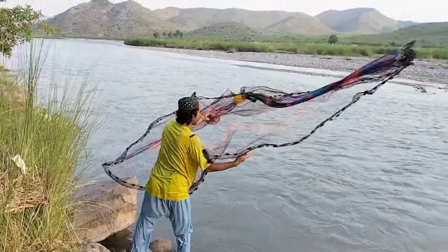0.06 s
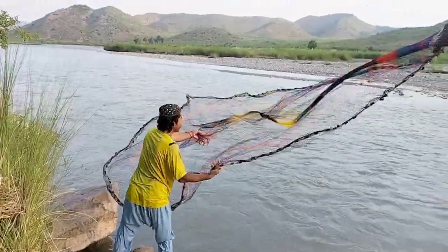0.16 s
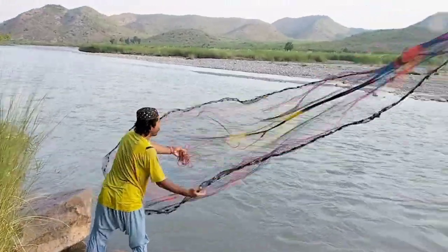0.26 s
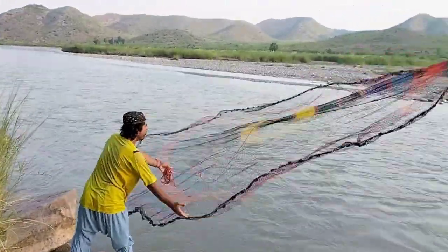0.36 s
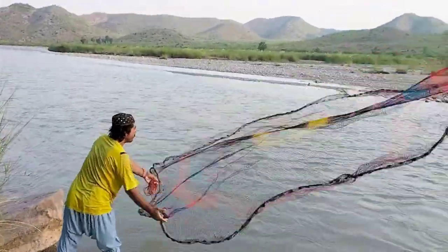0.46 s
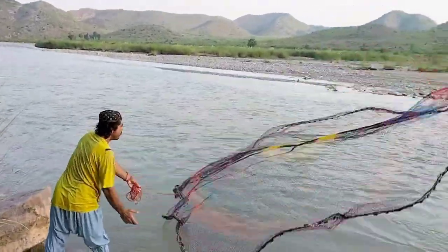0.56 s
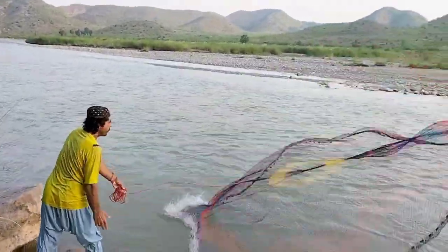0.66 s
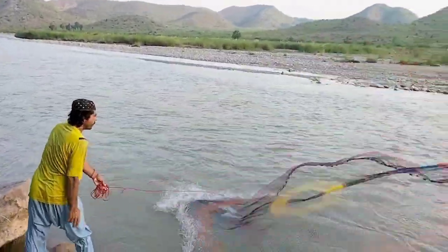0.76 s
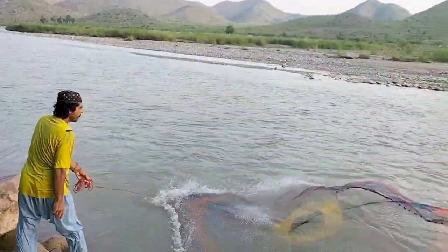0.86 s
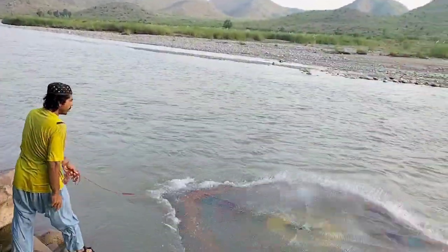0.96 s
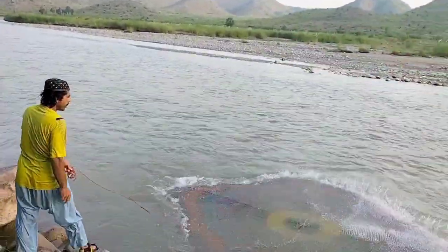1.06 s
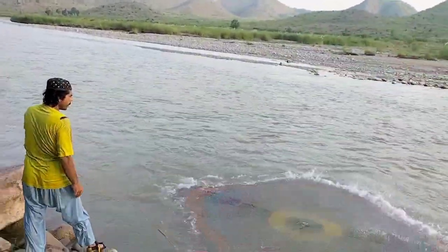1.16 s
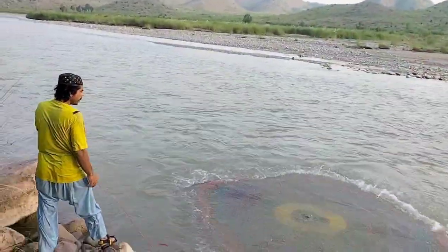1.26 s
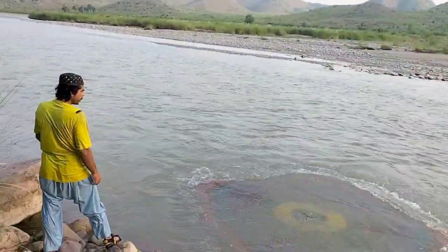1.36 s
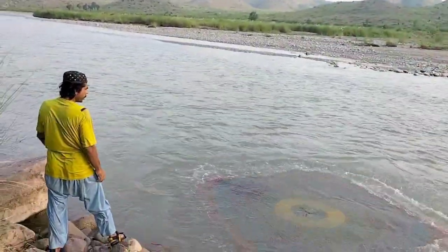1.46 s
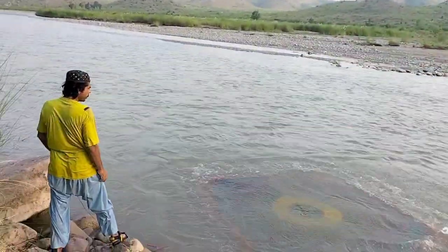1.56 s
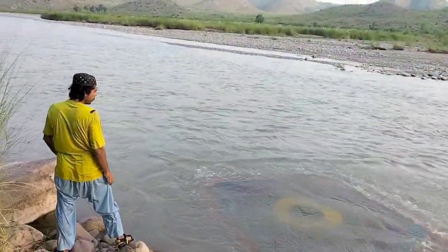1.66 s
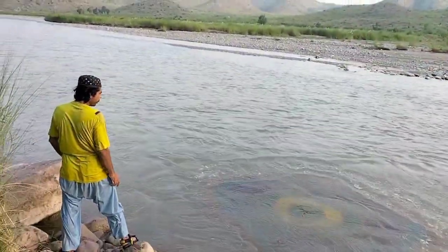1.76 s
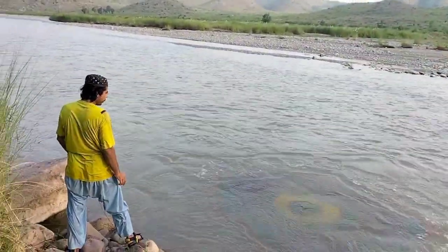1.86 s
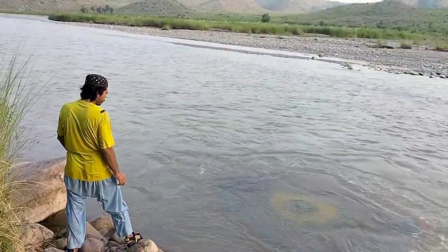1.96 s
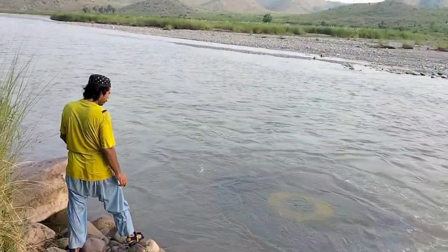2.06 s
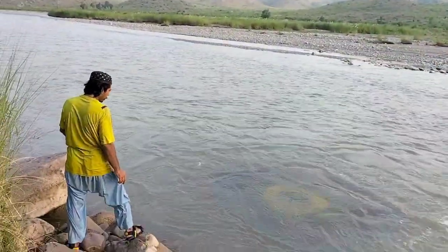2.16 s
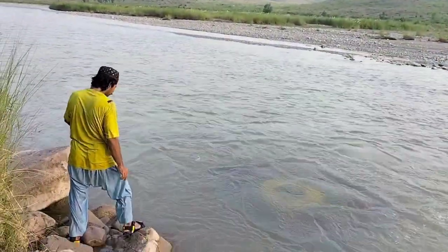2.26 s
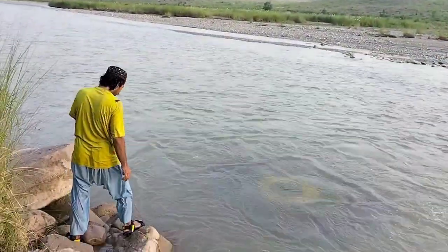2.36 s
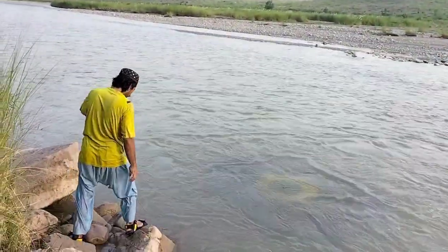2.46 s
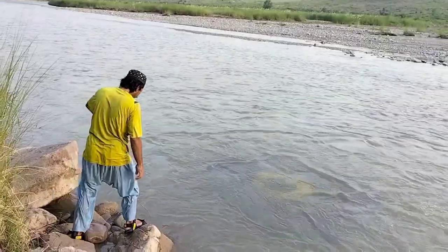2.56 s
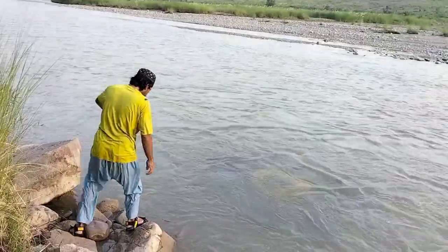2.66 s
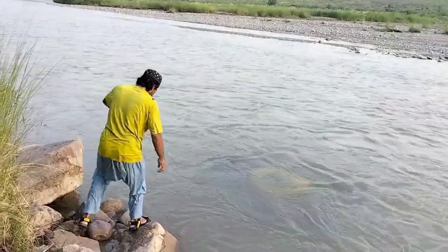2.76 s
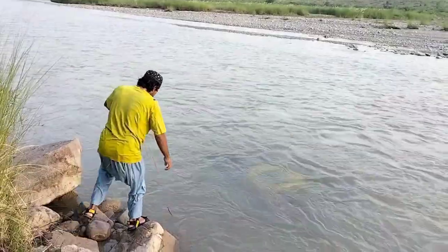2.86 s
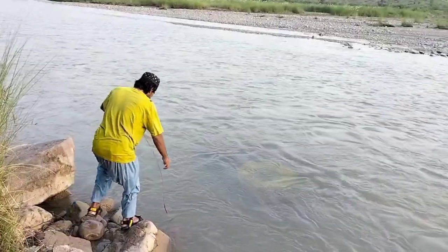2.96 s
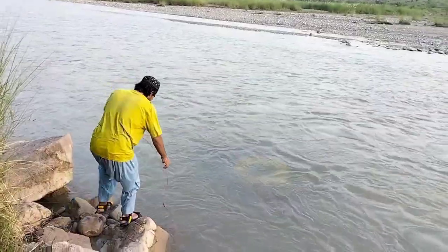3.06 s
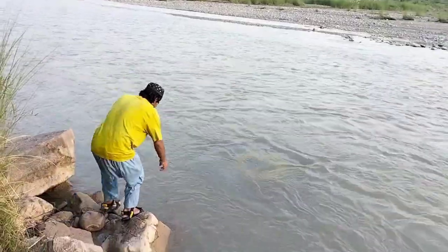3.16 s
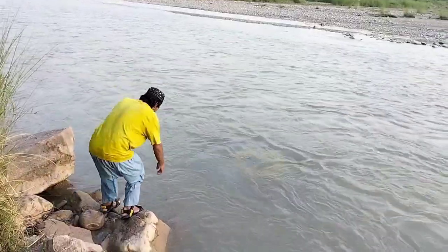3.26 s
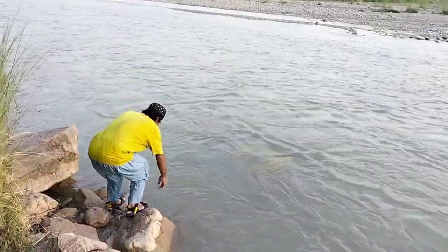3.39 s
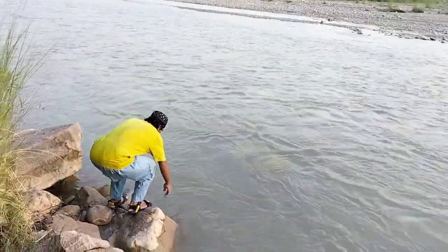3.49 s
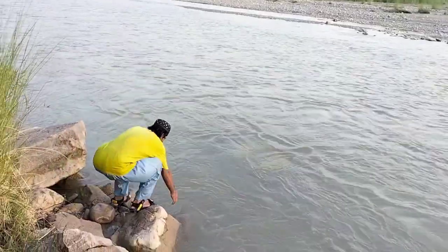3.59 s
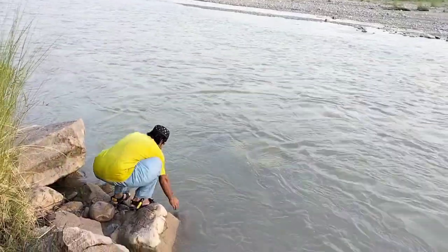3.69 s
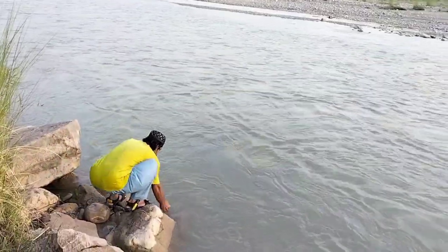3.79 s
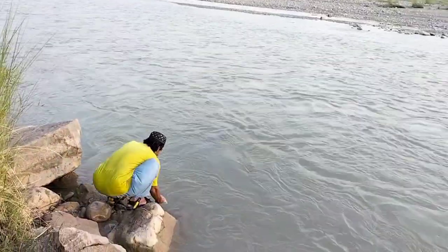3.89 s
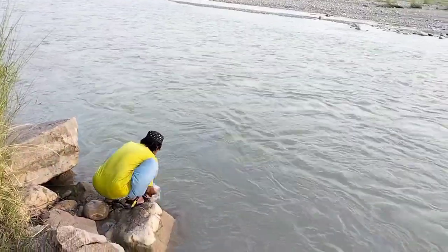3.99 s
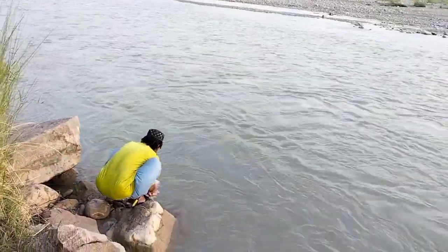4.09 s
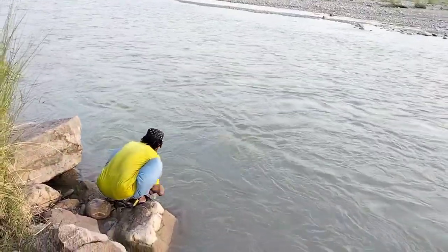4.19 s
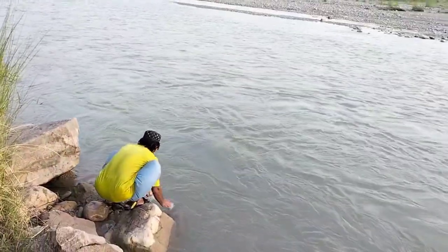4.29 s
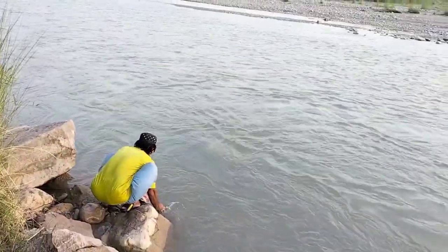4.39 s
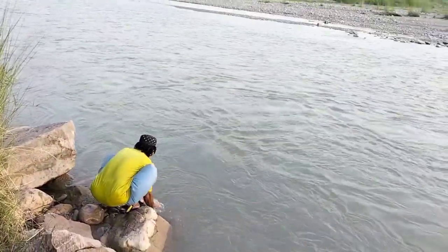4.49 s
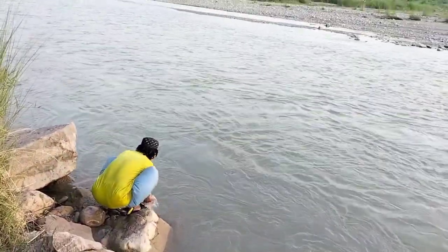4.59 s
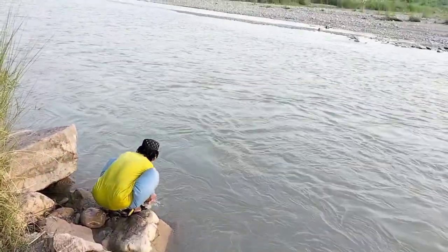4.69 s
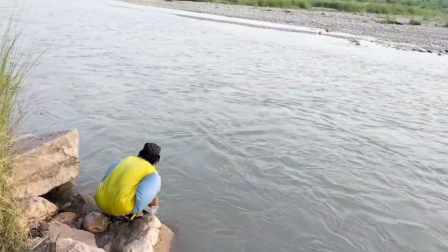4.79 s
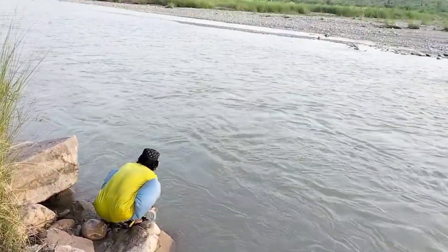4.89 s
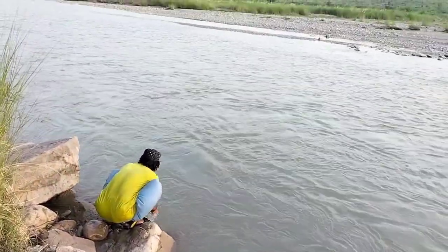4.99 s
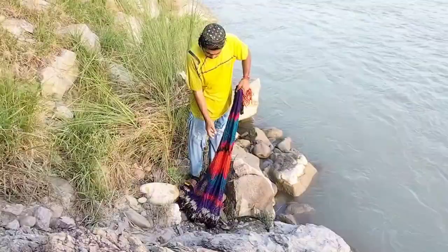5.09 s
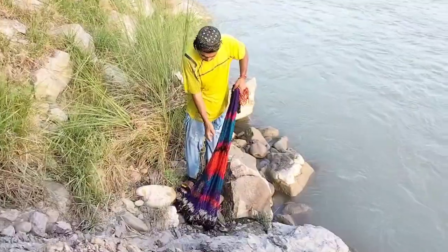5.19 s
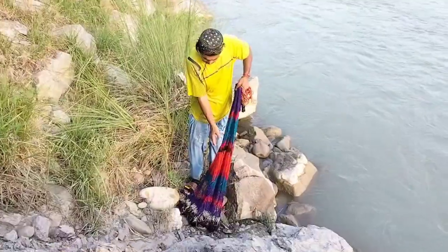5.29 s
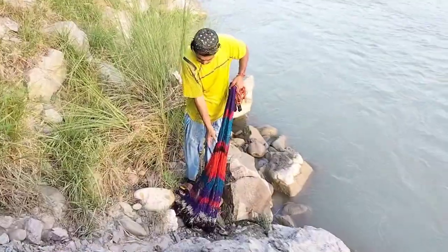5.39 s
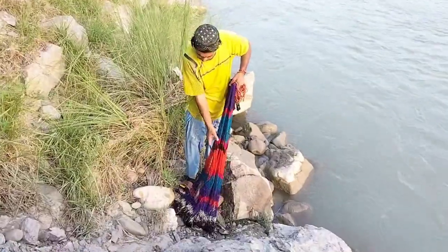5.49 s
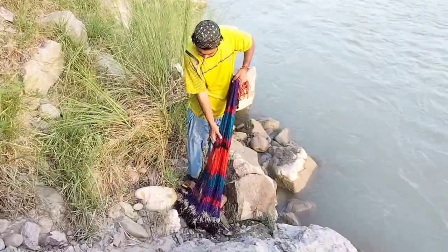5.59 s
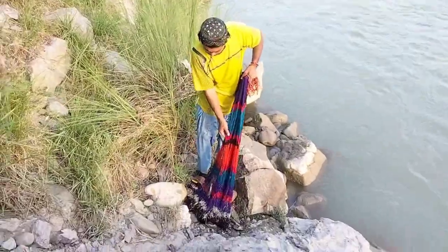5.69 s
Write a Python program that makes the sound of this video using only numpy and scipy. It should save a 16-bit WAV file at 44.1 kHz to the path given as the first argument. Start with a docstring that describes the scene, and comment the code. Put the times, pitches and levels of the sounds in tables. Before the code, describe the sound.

A quiet river rush with tiny bubbles runs throughout. At the very start a faint footstep and plop sound, and metal sinkers clink, sharpest at 0.1 s, with thin distant bird chirps until 0.4. From 0.67 s a cast net lands: crackling slaps, strongest around 0.8 and 1.0, bright hissing spray, low falling gulps, hollow plops and ringing drops. Smaller slaps follow near 1.25 and 1.35, and the fizz dies away by 1.9. Faint falling chirps repeat from 1.7 to 2.5; soft wind puffs rumble at 2.1, 3.25 and 5.1, and an eddy gurgles at 2.6. Light sandal steps with pebble clicks come at 2.75 and 3.5. From 3.85 to 5.1 wet mesh drips, trickles and sloshes in small irregular bursts, with plops, pings, a very faint bird and a thin high sizzle at 4.95. After a lull, sinkers clack and grind on stones from 5.57 to 5.7.

```python
"""A river runs throughout, made of coloured noise and tiny rising bubble tones. At first the sinkers of
a cast net clink (bursts of metallic ringing), over a footstep, and a small bird chirps far off in falling tones.
The net lands in one long splash: slaps and spray of noise, gulping cavities, bubbles and ringing drops.
A breeze puffs on the microphone and an eddy gurgles. The thrower steps down the rocks and works the wet net
at the bank, where it drips, sloshes and sizzles briefly. Last, the sinkers are set down on the stones."""
import sys
import numpy as np
from scipy import signal
from scipy.fft import rfft, irfft, next_fast_len
from scipy.io import wavfile
from scipy.ndimage import uniform_filter1d, map_coordinates

SR = 44100
rng = np.random.default_rng(int(sys.argv[2]) if len(sys.argv) > 2 else 0)


def put_to_file(sound):
    """Save the sound as 16-bit audio at rate SR, in the file named by the first command-line argument."""
    columns = np.atleast_2d(sound).T  # one column per channel
    safe = np.clip(columns, -1, 1)
    whole_steps = np.round(safe * 32767)
    wavfile.write(sys.argv[1], SR, whole_steps.astype(np.int16))


N = 253392
TIME = np.arange(N) / SR  # seconds

# How hard the water is thrown up while the net lands and sinks.
# Each row: time in seconds, spray level in dB.
SPRAY_LEVEL = [(0.671, -47), (.715, -36.5), (.75, -33.5), (1.03, -30.5), (1.15, -35), (1.42, -38.5),
               (1.61, -52), (1.7, -59.5), (1.95, -66.5)]
# Bunches of sinkers slap the water. Each row: start in seconds, level in dB, length in seconds.
SLAP_BURSTS = [(.6735, -39, .015), (.738, -28, .033), (.814, -26, 0.016), (.83, -24, 0.021),
               (1.012, -20, 0.016), (1.036, -29, 0.017), (1.255, -31.5, .0065), (1.364, -30.5, 0.0055),
               (1.633, -45.5, .011), (1.745, -53, 0.021)]
# The rim plunges under and leaves cavities in the water.
# Each row: start in seconds, pitch of the first gulp in Hz, its level in dB.
PLUNGE_CAVITIES = [(.745, 345, -42), (0.814, 402, -24), (.897, 346, -30), (.989, 275, -31.5),
                   (1.048, 223, -31.5), (1.087, 285, -25.5)]
# Each pull on the wet net sheds a slosh. Each row: start in seconds, level in dB, length in seconds.
SLOSH_BURSTS = [(3.862, -45, 0.04), (3.96, -52, 0.011), (4.128, -49, 0.013), (4.24, -59, 0.022),
                (4.394, -41, 0.025), (4.494, -44, 0.016), (4.585, -50, 0.025), (4.655, -50, 0.042),
                (4.7, -39.5, 0.027), (4.835, -51.5, .021), (4.914, -46.5, 0.054), (5.07, -51, 0.018)]
# Sandals on the rocks; the heel tips a pebble. Each row: start in seconds, grit level in dB,
# length in seconds, thud level in dB, pebble pitch in Hz, pebble level in dB.
FOOTSTEPS = [(.025, -62, 0.0068, -51, 3700, -56), (2.764, -50.5, 0.0083, -53, 3650, -45),
             (3.484, -51, 0.024, -67, 4270, -46.5)]


def amp(db):
    """Turn decibels into a gain."""
    return 10 ** (np.asarray(db) / 20)


def unit(x):
    """Scale to an average strength (rms) of 1."""
    return x / np.sqrt(np.mean(x ** 2) + 1e-20)


def even(x, seconds):
    """Hold a texture at rms 1 all along, so that only its colour and fine grain vary."""
    power = abs(uniform_filter1d(x ** 2, max(8, round(seconds * SR))))
    return x / np.sqrt(power + 1e-12)


def curves(rows):
    """Draw straight lines through the rows: one value per sample for each column after the time."""
    s, *cols = np.transpose(rows)
    return [np.interp(TIME, s, c) for c in cols]


def during(start, end, attack=0.011, release=0.041):
    """Rise, hold at 1 and fall between two times."""
    return np.clip(np.minimum((TIME - start) / attack, (end - TIME) / release), 0, 1)


def wobble(rate):
    """A smooth random curve with this many random points a second."""
    return map_coordinates(rng.standard_normal(int(N * rate / SR) + 4), [TIME * rate])


def add(track, s, sound):
    """Mix a sound into the track at time s."""
    start = max(0, round(s * SR))
    track[start:start + len(sound)] += sound[:max(0, N - start)]


def colour(x, points, keep_power=True):
    """Filter through (Hz, dB) points without pre-echo; white noise keeps its power unless told otherwise."""
    size = 2 * next_fast_len(N // 2 + 8192)
    hz, db = np.transpose(points)
    log_f = np.log(np.fft.rfftfreq(size, 1 / SR) + 1)
    gain = amp(np.interp(log_f, np.log(hz), db))
    # folding the cepstrum makes the filter answer only after its input
    cepstrum = irfft(np.log(unit(gain) if keep_power else gain))
    cepstrum[1:size // 2] *= 2
    cepstrum[size // 2 + 1:] = 0
    return irfft(rfft(x, size) * np.exp(rfft(cepstrum)))[:N]


def resonate(x, modes):
    """Pass x through (Hz, width, dB) resonances; white noise keeps its power."""
    size = next_fast_len(N + 8192)
    f = np.fft.rfftfreq(size, 1 / SR)
    response = 0
    for k, (hz, width, db) in enumerate(modes):
        peak = 1j * f * width / (hz * hz - f * f + 1j * f * width)
        response = response + (-1) ** k * amp(db) * peak  # signs alternate
    return irfft(rfft(x, size) * response / np.sqrt(np.mean(abs(response) ** 2)), size)[:N]


def clumped(x, depth_db, size=3):
    """Gather a texture into small patches of time and pitch, rms 1."""
    z = signal.stft(x, nperseg=256)[2]
    field = uniform_filter1d(rng.standard_normal(z.shape), size, 0)
    field = uniform_filter1d(field, size, 1)
    return unit(signal.istft(z * amp(depth_db * unit(field)), nperseg=256)[1][:N])


def scattered(sound, wet_db, t60):
    """Rocks and ripples return a short tail, new for every sound."""
    t = np.arange(SR // 10) / SR
    tail = rng.standard_normal(len(t)) * np.exp(-np.log(1000) * t / t60)
    return signal.fftconvolve(sound, (t == 0) + amp(wet_db) * tail / np.linalg.norm(tail))


def bubble(t, hz, cycles, rise):
    """A ringing bubble starts softly and rises in pitch as it dies by 60 dB over its life in cycles."""
    age = t * hz / cycles
    tone = np.sin(2 * np.pi * hz * t * (1 + rise * age / 2))
    return tone * np.exp(-np.log(1000) * age) * (1 - np.exp(-2 * hz * t))


def swarm(start, end, count, low_hz, high_hz, cycles, spread_db, rise=0.19, size=600):
    """Many short ringing tones at random times, pitches and strengths, rms 1 between start and end."""
    when, pitch, strength = rng.random((count, 3)).T[:, :, None]
    hz = low_hz * (high_hz / low_hz) ** pitch
    steps = np.arange(size)
    # a positive spread makes many faint and few loud; small ones make up for their short life
    loudness = hz * amp(-spread_db * np.log(1 - .98 * strength))
    grains = loudness * bubble(steps / SR, hz, cycles, rise)
    first = ((start + when * (end - start)) * SR).astype(int)
    mixed = np.bincount((first + steps).ravel(), grains.ravel(), N)[:N]
    return unit(mixed) * np.sqrt((end - start) * SR / N)


def bursts(rows, attack, tail_db, tail_t60):
    """Loudness curve of (s, dB, length s) bursts, each with a weaker tail; attack is a share of the length."""
    power, t = np.zeros(N), np.arange(SR // 2) / SR
    for s, db, length in rows:
        body = np.exp(-(t / length) ** 2)
        tail = amp(tail_db) * np.exp(-np.log(1000) * t / tail_t60)
        onset = 1 - np.exp(-t / (attack * length))
        add(power, s, (amp(db) * (body + tail) * onset) ** 2)
    return np.sqrt(power)


def doubled(rows, gap, change_db):
    """Follow each (s, dB, length s) burst with a second one."""
    return [(s + k * gap, db + k * change_db, length) for s, db, length in rows for k in (0, 1)]


def river():
    """The current: a soft rush of noise with countless small bubbles in it, and an eddy."""
    # Colour of the rush. Each row: frequency in Hz, relative level in dB.
    rush_colour = [(25, -28), (90, -15), (130, -8.5), (200, -1.5), (400, 1.5), (800, -4), (1200, -5),
                   (1700, -9.5), (2500, -9.5), (3900, -14), (4800, -19.5), (7000, -23.5), (9000, -37.5),
                   (15500, -30.5)]
    # An eddy gurgles by the stones. Each row: start in seconds, level in dB, length in seconds.
    eddy_bursts = [(2.56, -59, 0.17)]
    # Colour of the gurgle. Each row: frequency in Hz, relative level in dB.
    eddy_colour = [(700, -27), (1300, -1), (1700, -2), (2300, 6), (2900, -6), (4500, -43)]
    babble = swarm(0, N / SR, count=1500, low_hz=347, high_hz=5310, cycles=19, spread_db=3, size=900)
    water = rng.standard_normal(N) + amp(-11.5) * babble
    rush = amp(-58 + 1.1 * wobble(8.2)) * unit(colour(water, rush_colour))
    gurgle = colour(clumped(rng.standard_normal(N), depth_db=3.5), eddy_colour)
    return rush + bursts(eddy_bursts, attack=0.22, tail_db=-10, tail_t60=.5) * gurgle


def sinkers():
    """Small metal weights click against each other as the net opens, each knock rebounding once."""
    # Sinkers knock together in flight. Each row: start in seconds, level in dB, length in seconds.
    clinks = [(.02, -54, 0.015), (.1012, -26.5, .0045), (.134, -39, 0.0068), (.162, -48, .01),
              (.177, -44, 0.015), (.26, -54.5, 0.026), (.496, -56, 0.0066)]
    # Colour of the metal. Each row: frequency in Hz, relative level in dB.
    metal_colour = [(1500, -52), (2400, -15.5), (3300, -5), (4000, 2.5), (4600, -6), (5800, 0.5),
                    (6400, -3), (7200, -0.5), (9000, -19), (15500, -23)]
    chatter = swarm(0, SPRAY_LEVEL[0][0], count=1400, low_hz=2500, high_hz=15700, cycles=26,
                    spread_db=-1.5, size=400)
    ring = even(colour(chatter + 0.62 * rng.standard_normal(N), metal_colour), seconds=0.0032)
    knocks = doubled(clinks, gap=0.0075, change_db=-10)
    return bursts(knocks, attack=0.23, tail_db=-17.5, tail_t60=0.3) * ring


def rocks():
    """Each footstep or set-down sinker grinds some grit and thuds dully on the stone."""
    # The bundle of sinkers is set down on the stones.
    # Each row: start in seconds, grit level in dB, length in seconds, thud level in dB.
    knocks = [(5.567, -59, 0.02, -51), (5.627, -49, 0.02, -43.5), (5.642, -40.5, 0.0031, -37.5),
              (5.653, -39, .004, -60), (5.703, -58, .045, -68)]
    # Colours of grit and thud. Each row: frequency in Hz, relative level in dB.
    grit_colour = [(300, -14), (1300, -0.5), (2100, -7), (2750, 9), (3150, -0.5), (3600, 9), (4300, 0),
                   (5000, -1), (7500, -20), (9500, -38), (15500, -24)]
    thud_colour = [(50, -36), (140, -19), (220, -2.5), (410, 4.5), (540, -11.5), (1100, -11), (2500, -34.5)]
    toe_s, toe_db = 0.0183, -1  # the toe lands this much after the heel, and softer
    contacts = []
    for s, grit_db, length, thud_db, *_ in FOOTSTEPS:
        for k in (0, 1):  # heel, then toe
            contacts.append((s + k * toe_s, grit_db + k * toe_db, length, thud_db + k * toe_db))
    contacts = contacts + knocks
    grit = bursts([(s, db, length) for s, db, length, _ in contacts], attack=0.23, tail_db=-4.5, tail_t60=0.09)
    push = bursts([(s, db, length) for s, _, length, db in contacts], attack=0.077, tail_db=-27, tail_t60=0.068)
    grains = clumped(rng.standard_normal(N) * amp(1.4 * wobble(800)), depth_db=3.5)
    grinding = grit * even(colour(grains, grit_colour), seconds=0.0046)
    thuds = colour(push * even(rng.standard_normal(N), seconds=0.0058), thud_colour)
    return grinding + thuds


def pebbles():
    """A loose pebble clicks under each heel: a short ring of steady pitch."""
    out, t = np.zeros(N), np.arange(SR // 20) / SR
    for s, *_, hz, db in FOOTSTEPS:
        add(out, s, amp(db) * scattered(bubble(t, hz, cycles=52, rise=0), wet_db=7, t60=0.099))
    return out


def gulps(count=3):
    """Each cavity collapses in a run of gulps, each lower and weaker: (s, Hz, dB, life in cycles)."""
    gap_s, pitch_ratio, loss_db, cycles = .024, .75, 4.5, 16.7
    return [(s + k * gap_s, hz * pitch_ratio ** k, db - k * loss_db, cycles)
            for s, hz, db in PLUNGE_CAVITIES for k in range(count)]


def pockets():
    """Large cavities gulp low, small ones plop high; the water surface radiates no deep bass."""
    # Single air pockets plop in the water.
    # Each row: start in seconds, starting pitch in Hz, level in dB, life in cycles.
    plops = [(.026, 978, -37.5, 23), (0.816, 1080, -12.5, 20), (.968, 950, -21.5, 22), (.987, 788, -25, 35),
             (1.083, 675, -12.5, 14.8), (1.288, 648.3, -31, 55), (1.413, 300, -34.5, 14.8),
             (3.88, 820, -39.5, 37), (4.136, 940, -41.5, 65), (4.497, 1062, -32, 55),
             (4.697, 853, -40.5, 34), (4.779, 336, -43.5, 37)]
    # How the water surface radiates. Each row: frequency in Hz, gain in dB.
    surface_gain = [(60, -39), (105, -23), (150, -1.5), (2000, -2)]
    out, t = np.zeros(N), np.arange(SR // 5) / SR
    for s, hz, db, cycles in plops + gulps():
        add(out, s, amp(db) * scattered(bubble(t, hz, cycles, rise=0.088), wet_db=-6.0, t60=0.14))
    return colour(out, surface_gain, keep_power=False)


def bird():
    """Thin falling chirps from far along the bank, at a steady pace in bouts."""
    # Each row: start in seconds, end in seconds, first level in dB, fade in dB per second.
    bouts = [(0.063, .44, -68.5, 3), (1.737, 2.56, -63, 10), (3.642, 5.06, -74, -4.5)]
    out, t = np.zeros(N), np.linspace(0, 1, round(0.025 * SR))  # t runs 0 to 1 along a chirp
    start_hz, end_hz, period_s = 6200, 5450, .1502
    for start, end, db, fade in bouts:
        for s in np.arange(start, end, period_s):
            hz = (start_hz + (end_hz - start_hz) * t) * (1 + 0.015 * rng.standard_normal())
            chirp = np.sin(np.pi * t) ** 2 * np.sin(2 * np.pi * np.cumsum(hz) / SR)
            level = amp(db - fade * (s - start) + 2.0 * rng.standard_normal())
            add(out, s, level * scattered(chirp, wet_db=6.5, t60=0.073))
    return out


def splash():
    """The rim of sinkers hits the river: slaps and spray first, then the trapped air bubbles out."""
    # Colours of spray, bubbles and churning water. Each row: frequency in Hz, relative level in dB.
    spray_colour = [(500, -40), (1200, -15.5), (1550, -7), (2000, -6), (2500, -0.5), (2700, -1.5),
                    (3150, 1.5), (3450, -0.5), (3850, 1.5), (4600, -8.5), (5850, -7.5), (7400, -14.5),
                    (9500, -27.5), (15500, -19)]
    bubble_colour = [(80, -50), (350, -25.5), (500, -15), (680, -1), (900, 2), (1250, 2), (1500, -9.5),
                     (2200, -36.5)]
    churn_colour = [(40, -40), (80, -38), (125, -32), (190, -1.5), (330, 13.5), (460, 5.5), (700, -3.5),
                    (1200, -43)]
    # A slap is brighter than the spray. Each row: frequency in Hz, relative level in dB.
    slap_tilt = [(1500, 0), (4000, 0), (6000, 1.5), (12000, 3.5)]
    spray_db, = curves(SPRAY_LEVEL)
    start, end = SPRAY_LEVEL[0][0], SPRAY_LEVEL[-1][0]
    droplets = swarm(start, end, count=2000, low_hz=1520, high_hz=8900, cycles=22, spread_db=2.5)
    mist = clumped(rng.standard_normal(N), depth_db=1.5)
    fizz = unit(colour(mist + amp(-7.5) * droplets, spray_colour))
    spray = amp(spray_db) * during(start, end) * fizz

    # trapped air surfaces a moment later and runs out sooner than the spray
    air_start_s, air_rise_s, air_db, air_fade_db_per_s = 0.7194, 0.036, -0.5, 5.5
    air_level = amp(spray_db + air_db - air_fade_db_per_s * (TIME - air_start_s))
    surfacing = air_level * during(air_start_s, end, air_rise_s)
    air = swarm(start, end, count=1000, low_hz=452.4, high_hz=1713, cycles=32.0, spread_db=2.0, size=1800)
    bubbles = surfacing * even(colour(air + amp(1.0) * rng.standard_normal(N), bubble_colour), seconds=0.11)

    # the water churns round each cavity, and more softly wherever air surfaces
    stirs = [(s, db - 9.5, 0.045) for s, _, db in PLUNGE_CAVITIES]
    stirring = bursts(stirs, attack=0.44, tail_db=-21, tail_t60=.2)
    churn = (stirring + amp(-13.5) * surfacing) * unit(colour(rng.standard_normal(N), churn_colour))

    rough = colour(rng.standard_normal(N) * amp(2.1 * wobble(700)), spray_colour)
    crackle = even(colour(rough, slap_tilt), seconds=0.011)
    slaps = bursts(SLAP_BURSTS, attack=0.089, tail_db=-38, tail_t60=.12) * crackle
    return spray + bubbles + churn + slaps


def flung(rows, pitches, gain_db, detune, spread_db=5.0):
    """Each burst of water throws one drop of every size, landing a little later: (s, Hz, dB)."""
    within_s = .035
    chance = rng.random((len(rows), len(pitches), 3))
    thrown = []
    for (s, db, _), throw in zip(rows, chance):
        for hz, (late, sharp, loud) in zip(pitches, throw):
            pitch = hz * (1 + detune * (2 * sharp - 1))
            thrown.append((s + within_s * late, pitch, db + gain_db + spread_db * (2 * loud - 1)))
    return thrown


def drops():
    """Each drop traps a tiny bubble that rings for a moment."""
    # The brightest drops ping on the water. Each row: start in seconds, starting pitch in Hz, level in dB.
    pings = [(.674, 2490, -35.5), (.682, 2500, -37), (0.843, 4000, -20), (.947, 2474, -24),
             (1.011, 3100, -32), (1.041, 2780, -23), (1.364, 3080, -30), (1.555, 3080, -35),
             (1.633, 3300, -39), (3.868, 2700, -37.5), (3.87, 3480, -41), (3.892, 3500, -39),
             (3.98, 2430, -42), (3.995, 2830, -40), (4.244, 4450, -44.5), (4.522, 2780, -43),
             (4.588, 2800, -39.5), (5.075, 4240, -42)]
    # Middle pitches in Hz of the drops flung by each slap and by each slosh.
    slap_drop_hz = [2480, 3240, 4140]
    slosh_drop_hz = [2804, 3650, 4240]
    out, t = np.zeros(N), np.arange(SR // 20) / SR
    from_slaps = flung(SLAP_BURSTS, slap_drop_hz, gain_db=-3.5, detune=0.075)
    from_sloshes = flung(SLOSH_BURSTS, slosh_drop_hz, gain_db=0.5, detune=0.04)
    for s, hz, db in pings + from_slaps + from_sloshes:
        add(out, s, amp(db) * scattered(bubble(t, hz, cycles=88, rise=0.023), wet_db=-1, t60=0.21))
    return out


def breeze():
    """Soft puffs of low noise rumble on the microphone, each trailed by a second."""
    # Each row: start in seconds, level in dB, length in seconds.
    puff_bursts = [(2.055, -63.5, 0.072), (3.25, -61.5, .035), (5.115, -62.5, 0.054)]
    # Colour of the rumble. Each row: frequency in Hz, relative level in dB.
    rumble_colour = [(20, -6), (50, 1), (80, 0.5), (130, -15), (300, -35)]
    pairs = doubled(puff_bursts, gap=0.118, change_db=-0.5)
    puffs = bursts(pairs, attack=0.27, tail_db=-28, tail_t60=.3)
    return puffs * unit(colour(rng.standard_normal(N), rumble_colour))


def dripping():
    """Handfuls of drops fall between the stones over a thin trickle; the wet mesh crackles."""
    # The hollows among the wet stones ring. Each row: pitch in Hz, width in Hz, relative level in dB.
    hollows = [(950, 230, -4.5), (2090, 540, -7), (2770, 175, 2), (3540, 100, 2.5), (3840, 210, -1.5),
               (4270, 230, -8), (4820, 180, -3.5), (5830, 360, -13), (6800, 220, -19), (13800, 4300, -55)]
    start, end = 3.8, 5.125  # seconds
    patter = swarm(start, end, count=2600, low_hz=883, high_hz=12200, cycles=34, spread_db=3.0, size=900)
    falling = clumped(amp(-4) * rng.standard_normal(N) + patter, depth_db=4, size=4)
    water = even(resonate(falling, hollows), seconds=0.016)

    # the trickle swells while the net is lifted, holds and stops
    lifted = during(start, end, attack=0.6, release=0.044)
    trickle = amp(-58.5 + 1.5 * wobble(25)) * np.sqrt(lifted)

    # more water falls back after each slosh, and all of it arrives spread out in time
    pairs = doubled(SLOSH_BURSTS, gap=0.026, change_db=-6.5)
    sloshes = bursts(pairs, attack=0.48, tail_db=-39, tail_t60=0.19)
    sloshes = uniform_filter1d(sloshes, round(.009 * SR))

    # the mesh crackles softly, more as it leaves the water
    ticks = swarm(start, end, count=1500, low_hz=5970, high_hz=15600, cycles=9, spread_db=3.5, size=100)
    crackle = lifted * (amp(-84.5) + 0.11 * sloshes) * ticks
    return np.hypot(sloshes, trickle) * water + crackle


def sizzle():
    """A brief, thin, very high sizzle of filtered noise."""
    # Each row: start in seconds, level in dB, length in seconds.
    sizzle_bursts = [(4.948, -53, 0.052)]
    # Colour of the sizzle. Each row: frequency in Hz, relative level in dB.
    sizzle_colour = [(7000, -38), (13800, -21), (14700, 12), (15300, -12)]
    level = bursts(sizzle_bursts, attack=.3, tail_db=-25, tail_t60=.3)
    return level * colour(rng.standard_normal(N), sizzle_colour)


def mirrored(x, delay, wander, share):
    """A nearby surface returns a copy whose delay, in seconds, wanders smoothly."""
    lag = delay * np.exp(wander * wobble(4))
    return (x + share * np.interp(TIME - lag, TIME, x)) / np.sqrt(1 + share ** 2)


def scene():
    """Open air: nearby water and rocks return the cast and the bank sounds after a millisecond or two."""
    cast = mirrored(splash() + sinkers(), delay=0.00151, wander=0.16, share=0.15)
    bank = mirrored(dripping() + rocks(), delay=0.001132, wander=0.16, share=0.33)
    ringing = pockets() + drops() + pebbles()
    return (river() + cast + bank + ringing + sizzle() + bird() + breeze())[None]


def record(dry):
    """A small microphone, dull in the high treble, and the recorder's sharp upper limit."""
    # How the microphone hears. Each row: frequency in Hz, gain in dB.
    microphone_gain = [(7500, -1.5), (8400, -5), (9300, -10), (11000, -13), (12000, -6), (12800, -8.5),
                       (15000, -12.5)]
    top_hz = 15750
    heard = colour(dry[0], microphone_gain, keep_power=False)
    return irfft(rfft(heard) * (np.fft.rfftfreq(N, 1 / SR) < top_hz), N)[None]


dry = scene()
out = record(dry)
put_to_file(out)
```